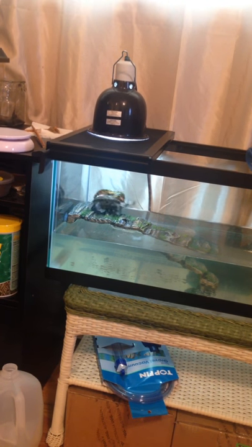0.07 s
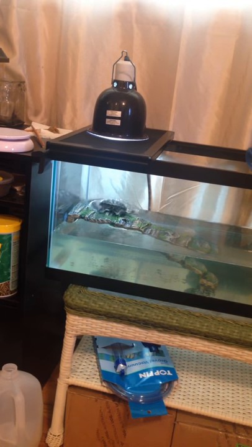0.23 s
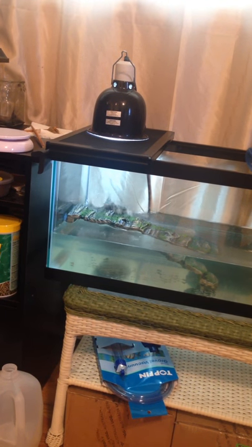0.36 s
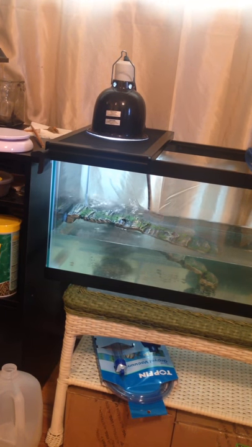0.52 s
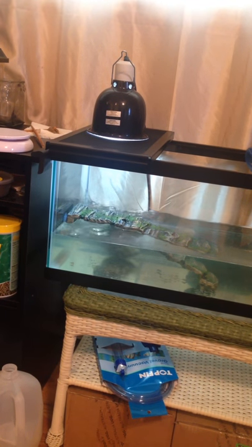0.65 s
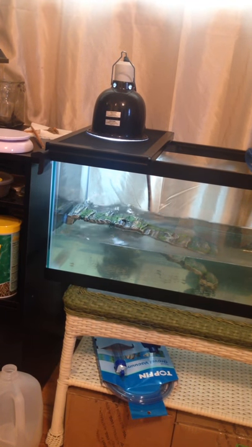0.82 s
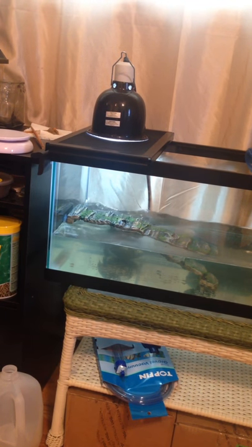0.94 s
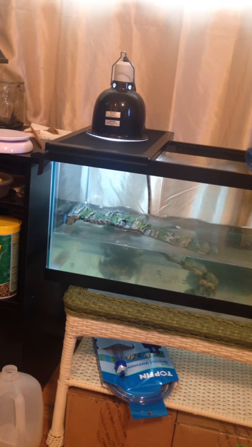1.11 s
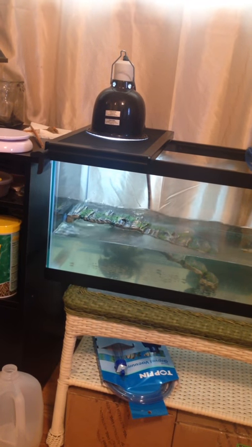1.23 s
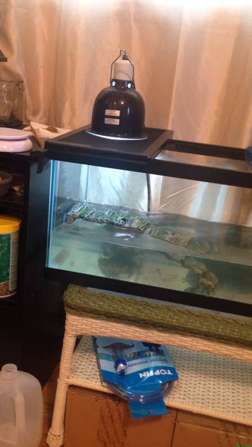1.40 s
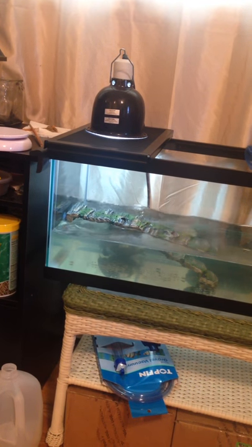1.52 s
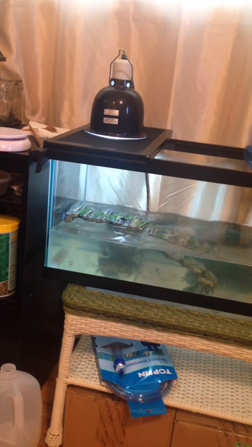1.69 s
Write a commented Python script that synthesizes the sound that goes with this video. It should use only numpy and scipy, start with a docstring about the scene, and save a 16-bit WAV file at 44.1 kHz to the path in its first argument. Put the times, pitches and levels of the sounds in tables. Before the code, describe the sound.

Short plopping splash of turtles dropping into a glass aquarium, with soft platform knocks

```python
"""Turtles dropping into an aquarium

In a small, quiet room, turtles scramble off a floating platform and drop into a glass tank.
Trapped air plops as swelling sines, the platform knocks as damped modes with a noise thud,
spray and tiny bubbles fizz as showers of short rings, and claws and drips tick brightly.
Glass walls and room answer every event; a sinking hum and thin whine lie with faint hiss."""
import sys
import numpy as np
from scipy import signal
from scipy.fft import rfft, irfft, next_fast_len
from scipy.io import wavfile
from scipy.ndimage import map_coordinates

SR = 44100
rng = np.random.default_rng(int(sys.argv[2]) if len(sys.argv) > 2 else 0)


def log_audio(samples):
    """Write samples as a 16-bit WAV file to the path given in sys.argv[1]."""
    # one column per channel
    frames = np.atleast_2d(samples).T
    # limit to full scale, then quantise
    limited = np.clip(frames, -1, 1)
    pcm = np.round(limited * 32767).astype(np.int16)
    wavfile.write(sys.argv[1], SR, pcm)


N = 77175
T = np.arange(SR * 6 // 10) / SR  # time within one event and its echoes, s


# Air pockets closing under water.
# Each row: start in seconds, middle pitch in Hz, level in dB, time to fall 60 dB in seconds.
AIR_POCKETS = [(.283, 750, -44, 0.045), (0.319, 3880, -26.5, 0.0038), (0.3233, 1970, -24, .009),
               (0.3303, 1870, -29.5, 0.012), (0.3653, 724, -27, 0.025), (.367, 3660, -41, 0.016),
               (0.391, 179, -34.5, 0.038), (.427, 1625, -35.5, 0.0081), (0.527, 1408, -51, 0.049),
               (.555, 2200, -36, 0.004), (0.5547, 3910, -41.5, 0.01), (0.565, 2610, -42, 0.021),
               (0.631, 182, -33.5, 0.014)]
PLOP_ECHO_DB = (-1, -4)  # glass, room


def plops(rise=0.078, swell_cycles=0.66):
    """Each air pocket swells within a cycle or two, rings briefly and rises a little in pitch."""
    out = np.zeros(N)
    for start_s, hz, db, t60 in AIR_POCKETS:
        pitch = hz * (1 + rise * (.5 - fade(T, t60)))
        cycles = np.cumsum(pitch) / SR
        swell = 1 - np.exp(-(cycles / swell_cycles) ** 2)
        shape = swell * fade(T, t60)
        bubble = shape / shape.max() * np.sin(2 * np.pi * cycles)
        add(out, start_s, amp(db) * thin(bubble, hz / 2), PLOP_ECHO_DB)
    return out


# The platform bumping the tank.
# Each row: start in seconds, peak level in dB, thin below this Hz, dull above this Hz.
PLATFORM_BUMPS = [(0.146, -50.5, 148, 300), (0.179, -42, 210, 400), (.196, -50.5, 255, 346),
                  (0.21, -39.5, 260, 352), (0.298, -46.5, 172, 255), (.365, -36, 225, 370),
                  (0.381, -42, 280, 454), (0.554, -46.5, 645, 696), (0.6133, -33.5, 165, 615),
                  (.630, -39.5, 127, 223), (0.676, -68, 150, 248), (1.11, -51.5, 390, 1510),
                  (1.487, -59, 154, 252)]
# Resonances of platform and tank.
# Each row: pitch in Hz, mean level in dB, time to fall 60 dB in seconds.
TANK_MODES = [(138.3, -9.5, 0.2), (201.8, -6, 0.1), (297.6, -4, 0.052), (366.8, -1, 0.028),
              (495, -11, 0.036), (636, -9.5, 0.082), (796, -8.5, 0.05), (990, -2.5, 0.017),
              (1405, -7, 0.013)]
THUD_DB, THUD_T60_S = 6.5, 0.011  # level beside the modes, before the blow is filtered
KNOCK_ECHO_DB = (-7.5, -5.5)  # glass, room


def knocks(rise_s=0.0018):
    """The platform bumps softly and rings the water-filled tank."""
    out = np.zeros(N)
    for start_s, db, low_hz, high_hz in PLATFORM_BUMPS:
        rumble = unit(dull(rng.standard_normal(len(T)), hz=1510))
        thud = amp(THUD_DB) * rumble * fade(T, THUD_T60_S)
        soft_start = 1 - np.exp(-T / rise_s)
        blow = (ring(TANK_MODES, scatter_db=3.5) + thud) * soft_start
        blow = thin(dull(blow, high_hz), low_hz)
        add(out, start_s, amp(db) * blow / abs(blow).max(), KNOCK_ECHO_DB)
    return out


def ring(modes, scatter_db):
    """Damped modes, each at a slightly different level at every blow."""
    total = np.zeros(len(T))
    for hz, db, t60 in modes:
        level = amp(db + scatter_db * rng.standard_normal())
        total += level * fade(T, t60) * np.sin(2 * np.pi * hz * T)
    return total


# Showers of droplets and tiny bubbles.
# Each row: start in seconds, level in dB, decay time constant in seconds, centre pitch in Hz,
# pitch spread in octaves.
DROPLET_SHOWERS = [(.228, -56, .008, 1880, 0.21), (0.233, -56, 0.016, 6900, 0.33),
                   (0.243, -58.5, 0.045, 2790, 0.44), (0.259, -51, 0.0077, 8200, 0.42),
                   (0.299, -60.5, 0.054, 3460, 1.11), (0.323, -43, 0.015, 3370, 0.35),
                   (0.336, -39, 0.024, 1840, 0.17), (0.36, -54.5, 0.011, 10000, 0.38),
                   (0.378, -44, 0.0037, 2670, 0.57), (.407, -54.5, 0.03, 6300, 0.4),
                   (.425, -41.5, 0.0041, 6580, 0.634), (0.431, -44, 0.0061, 4400, 0.51),
                   (.555, -48.5, 0.0055, 2980, 0.37), (0.5592, -45.5, 0.0039, 10250, 0.22),
                   (0.56, -55, 0.009, 5930, 0.4), (0.607, -56.5, 0.0065, 2800, 0.88),
                   (.622, -49, 0.0092, 937, 0.081), (1.117, -64, 0.0098, 1580, 0.57)]
DROPS_PER_S, DROP_SCATTER_DB = 5500, 3
DROP_CYCLES = 17.2  # cycles a drop takes to fall 60 dB
SPRAY_RISE_S = 0.00051
SPRAY_ECHO_DB = (0.5, -5.5)  # glass, room


def sprays():
    """Thrown water lands as a dying shower of tiny ringing droplets."""
    out = np.zeros(N)
    t = T[:256]  # time within one drop
    for start_s, db, length_s, centre_hz, spread in DROPLET_SHOWERS:
        count = int(DROPS_PER_S * T[-1])
        drop_start = rng.integers(len(T), size=(count, 1))
        pitch, size = rng.standard_normal((2, count, 1))
        hz = np.minimum(centre_hz * 2 ** (spread * pitch), SR / 2)
        drops = amp(DROP_SCATTER_DB * size) * np.sin(2 * np.pi * hz * t)
        drops *= fade(t, DROP_CYCLES / hz)
        # sum the overlapping drops, sample by sample
        places = drop_start + np.arange(len(t))
        shower = np.bincount(places.ravel(), drops.ravel(), len(T))[:len(T)]
        shower = unit(thin(shower, centre_hz * 2 ** (-2 * spread)))
        shape = (1 - np.exp(-T / SPRAY_RISE_S)) * np.exp(-T / length_s)
        add(out, start_s, amp(db) * shower * shape / shape.max(), SPRAY_ECHO_DB)
    return out


# Small sharp ticks of claws and drips.
# Each row: start in seconds, level in dB, pitch in Hz, time for the ring to fall 60 dB in seconds,
# crack in dB over the ring before filtering, echo of both glass and room in dB.
CLAW_AND_DRIP_TICKS = [(0.1167, -45.5, 10500, 0.0056, -9, 3.5), (0.117, -49, 4500, 0.0054, -27, 2),
                       (0.149, -53, 13200, .004, -19, 0), (1.234, -52, 4800, 0.0019, 8.5, -3.5),
                       (1.608, -40, 11150, 0.0025, -4.5, -10), (1.61, -54, 6130, 0.0022, -6, -12)]
CRACK_T60_S = .012


def ticks():
    """Tiny bright contacts: a brief sine ring and a crack of noise."""
    out = np.zeros(N)
    for start_s, db, hz, t60, crack_db, echo_db in CLAW_AND_DRIP_TICKS:
        crack = amp(crack_db) * thin(rng.standard_normal(len(T)), hz / 2) * fade(T, CRACK_T60_S)
        contact = fade(T, t60) * np.sin(2 * np.pi * hz * T) + dull(crack, hz)
        add(out, start_s, amp(db) * contact, (echo_db, echo_db))
    return out


# How long the small room holds each band.
# Each row: frequency in Hz, time to fall 60 dB in seconds.
ROOM_DECAY = [(130, 0.38), (300, 0.4), (700, 0.27), (2000, 0.24), (5000, 0.37), (14000, 0.16)]
ROOM_DELAY_S, GLASS_DELAY_S, GLASS_T60_S = 0.018, 0.0026, 0.056


def add(out, start_s, sound, echo_db):
    """Place a sound in time, with its quick echoes between the glass walls and its tail in the room."""
    # the room: noise whose bands die at their own rates
    hz, t, bands = signal.stft(rng.standard_normal(len(T)), SR, nperseg=256)
    bands = bands * fade(t, along(ROOM_DECAY, hz)[:, None])
    room = signal.istft(bands, SR, nperseg=256)[1][:len(T)] * (T > ROOM_DELAY_S)
    glass = rng.standard_normal(len(T)) * fade(T, GLASS_T60_S) * (T > GLASS_DELAY_S)
    echoes = np.zeros(len(T))
    for db, tail in zip(echo_db, (glass, room)):
        echoes += amp(db) * unit(signal.fftconvolve(sound, tail)[:len(T)])
    part = out[round(start_s * SR):][:len(T)]
    part += (sound + sound.std() * echoes)[:len(part)]  # echo levels are relative to the sound


# The path of the low hum.
# Each row: time in seconds, pitch in Hz, rms level in dB before the waver.
HUM_PATH = [(0, 137, -76), (.35, 137, -63), (.8, 134, -61), (1.0, 129, -66), (1.17, 124, -61),
            (1.3, 122, -65), (1.5, 114, -66), (1.75, 96, -68)]
HUM_WAVER_DB = 1.8


def hum(wavers_per_s=14):
    """A low sine hum that wavers in level and sinks in pitch."""
    t = np.arange(N) / SR
    time_s, hz, db = np.transpose(HUM_PATH)
    knots = rng.standard_normal(int(t[-1] * wavers_per_s) + 4)
    waver = map_coordinates(knots, [t * wavers_per_s])  # a smooth curve through random points
    level = amp(np.interp(t, time_s, db) + HUM_WAVER_DB * waver)
    cycles = np.cumsum(np.interp(t, time_s, hz)) / SR
    return level * unit(np.sin(2 * np.pi * cycles))


def whine(hz=1084, db=-83):
    """A thin steady sine."""
    return amp(db) * unit(np.sin(2 * np.pi * hz * np.arange(N) / SR))


# Room hiss and rumble.
# Each row: frequency in Hz, relative level in dB per Hz.
AIR_SPECTRUM = [(20, -30), (50, -11), (70, -2), (105, -4), (150, -9), (215, -7), (300, -13), (410, -18),
                (495, -13), (560, -18), (760, -20), (1100, -23), (1600, -27), (2800, -27.5), (4200, -25.5),
                (6500, -27), (10900, -27.5), (15500, -31)]
AIR_DB = -60.5  # rms


def air():
    """The quiet room's hiss and rumble: steady coloured noise."""
    return amp(AIR_DB) * noise(AIR_SPECTRUM)


def noise(spectrum):
    """Coloured noise of rms 1."""
    return unit(filtered(rng.standard_normal(N), lambda hz: amp(along(spectrum, hz))))


def thin(x, hz):
    """High-pass: a light contact moves little bass."""
    return signal.sosfilt(signal.butter(3, hz, "high", fs=SR, output="sos"), x)


def dull(x, hz):
    """Low-pass: a soft contact loses its treble."""
    return signal.sosfilt(signal.butter(2, min(hz, SR / 2 - 100), fs=SR, output="sos"), x)


def filtered(x, response):
    """x times a response of frequency, padded so that the end does not wrap round."""
    m = next_fast_len(N + SR // 2)
    return irfft(rfft(x, m) * response(np.fft.rfftfreq(m, 1 / SR)), m)[:N]


def along(points, hz):
    """(Hz, value) points read on a log frequency axis."""
    f, v = np.transpose(points)
    return np.interp(np.log(hz + 1), np.log(f + 1), v)


def fade(t, t60):
    """Exponential decay that falls 60 dB in t60 seconds."""
    return np.exp(-np.log(1000) * t / t60)


def amp(db):
    """Decibels to gain."""
    return 10 ** (np.asarray(db) / 20)


def unit(x):
    """Scale to rms 1."""
    return x / np.sqrt(np.mean(x ** 2) + 1e-20)


def scene():
    """The splash in its tank over the quiet room's hum, whine and hiss."""
    splash = plops() + knocks() + sprays() + ticks()
    return (splash + hum() + whine() + air())[None]


def record(dry, top_hz=15650):
    """The recorder keeps nothing above its band limit."""
    return filtered(dry[0], lambda hz: hz < top_hz)[None]


dry = scene()
out = record(dry)
log_audio(out)
```